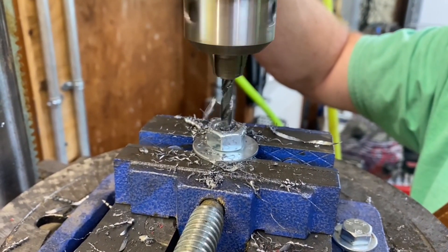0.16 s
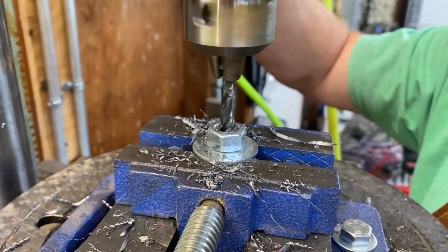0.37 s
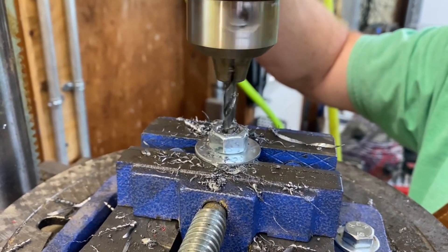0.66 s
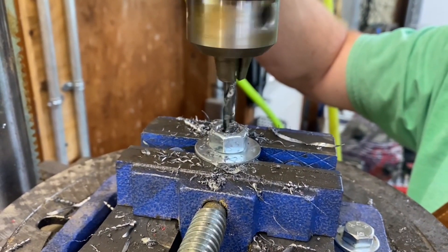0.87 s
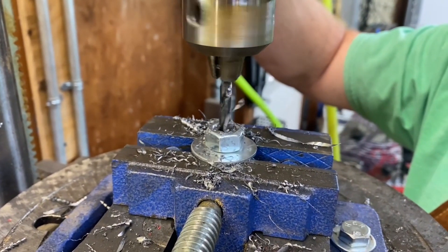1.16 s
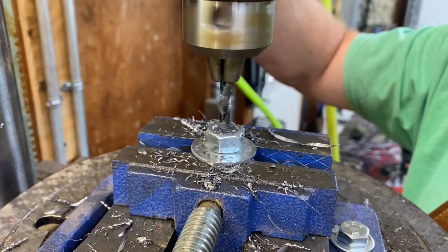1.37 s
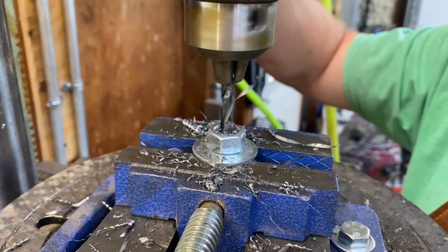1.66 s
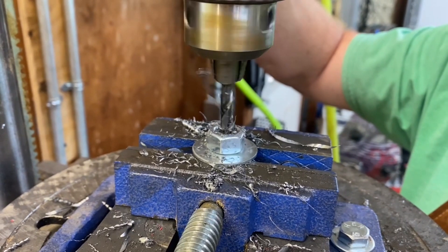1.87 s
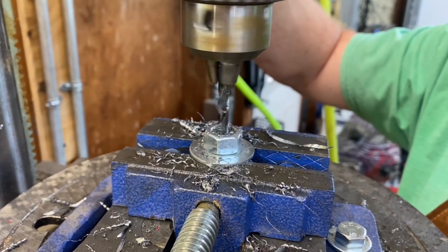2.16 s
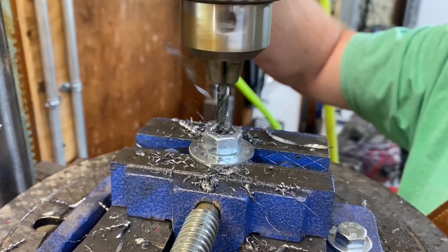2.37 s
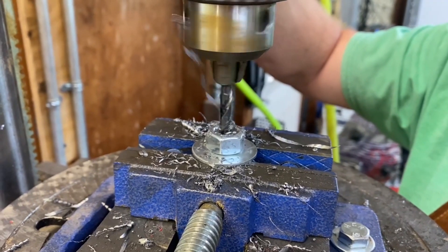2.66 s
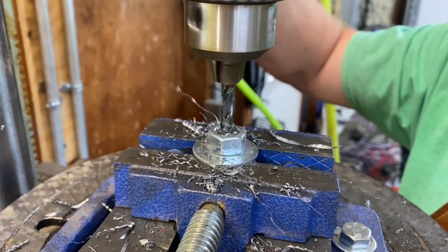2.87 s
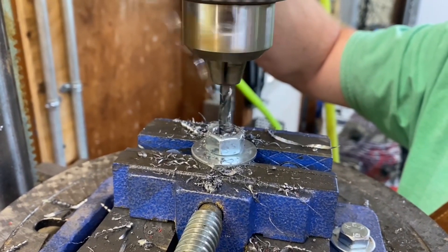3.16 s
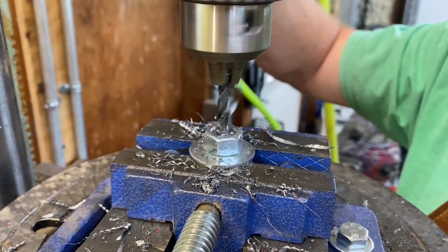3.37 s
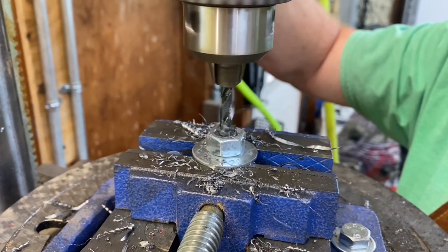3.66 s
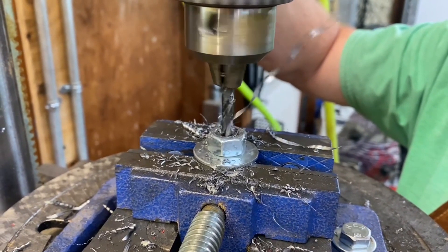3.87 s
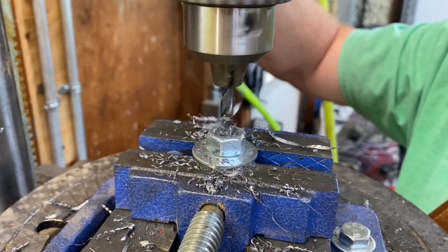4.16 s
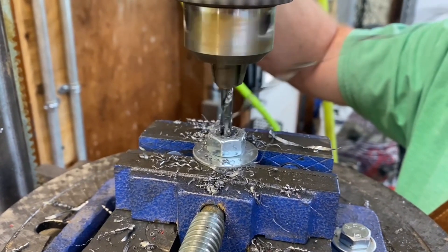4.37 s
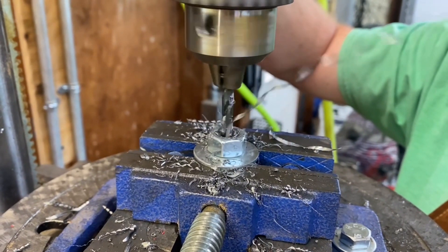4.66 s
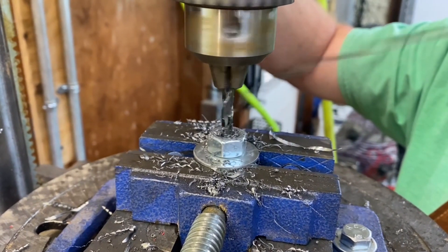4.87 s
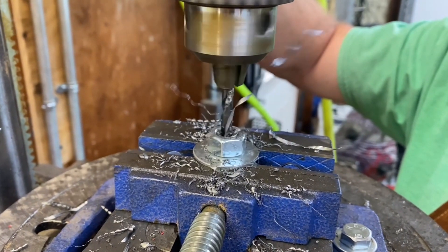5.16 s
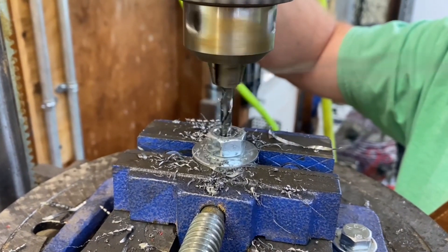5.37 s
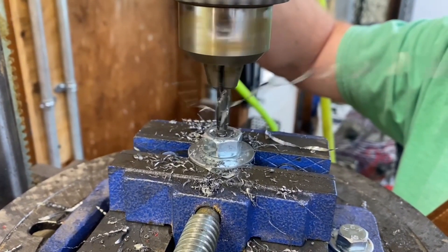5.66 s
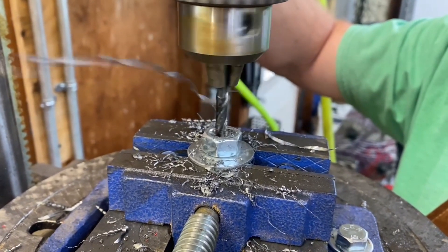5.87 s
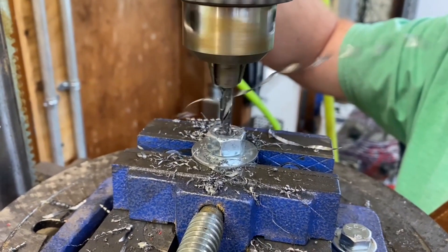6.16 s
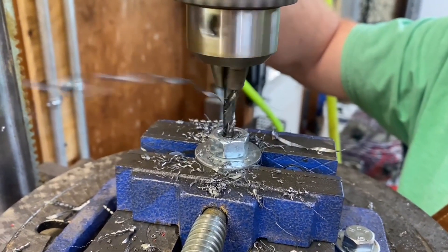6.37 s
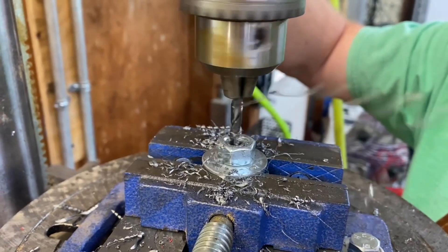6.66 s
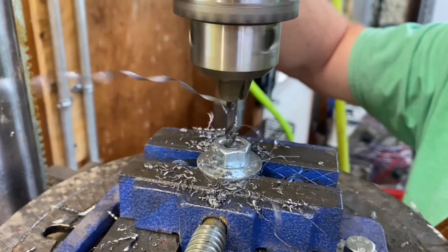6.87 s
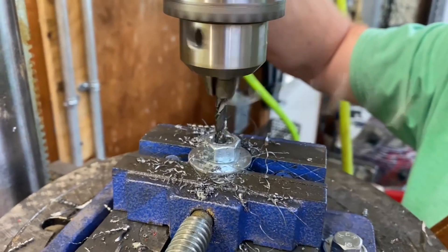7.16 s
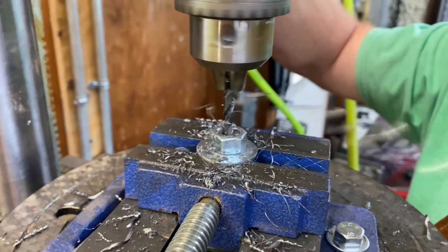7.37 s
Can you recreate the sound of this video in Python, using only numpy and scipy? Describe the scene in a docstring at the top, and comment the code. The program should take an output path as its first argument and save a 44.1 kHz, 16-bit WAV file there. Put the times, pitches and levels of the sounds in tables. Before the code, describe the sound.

Two close microphones beside a running drill press: constant mains hum, wavering motor whine and belt-guard drone. Over it, rough steel cutting surges and bites, first scraping with faint chirps, then turning brittle and crunchy, then scraping again with thin squeaks. Fine shavings crackle and tick throughout. Soft low thuds arrive late, followed by four hard snaps with thin high rings. The small room adds only a little reverberation.

```python
"""A drill press runs steadily in a small workshop while a twist bit bores slowly into a steel bolt held in a vise.
The motor's hum and whine are sine tones; belt, bearings and cutting edges are trains of tiny random
impacts coloured by the resonances of the machine. The edges bite and squeak, and curls of swarf
(metal shavings) crackle, whistle and tick against the steel. Two close microphones hear it."""
import sys
import numpy as np
from scipy import signal
from scipy.fft import rfft, irfft, next_fast_len
from scipy.io import wavfile
from scipy.ndimage import map_coordinates

SR = 44100
rng = np.random.default_rng(int(sys.argv[2]) if len(sys.argv) > 2 else 0)


def wrap_up_sound(samples):
    """Save the sound to the file named by the first command line argument, as 16-bit audio."""
    columns = np.atleast_2d(samples).T
    # keep every value between -1 and 1, then stretch to whole-number steps
    tamed = np.clip(columns, -1, 1)
    steps = np.round(tamed * 32767).astype(np.int16)
    wavfile.write(sys.argv[1], SR, steps)


N = 331191
T = np.arange(N) / SR  # time of each sample, s
SIDES = np.array([[.5], [-.5]])  # half of a left-right difference goes to each side
TOP_HZ = 15900  # band limit
RIPPLE_HZ = 120  # pulses of the motor's torque
THROB_HZ = 6.25  # slow throb of the lowest hum tone
TURN_HZ = 4.8  # turns of the bit a second

# Resonances of the press's head and table: pitch_hz, width_hz, lift_db
FRAME = [(144.5, 13.7, 15), (304.6, 16, 10), (320, 26, 7), (584.4, 31.5, 10.5), (1016, 30, 6.5),
         (1217, 53, 5), (1534, 61, 8.5), (1792, 150, 6), (1984, 23, 9), (2182, 29, 11.5)]
# Resonances of bit, chuck and vise: pitch_hz, width_hz, lift_db
BIT = [(2173, 26, 14), (2670, 135, 13.5), (2894, 13, 19.5), (3256, 99, 18.5), (3647, 114, 13),
       (4490, 63, 12), (5085, 97, 6.5), (5580, 240, -15), (7180, 400, 12), (8005, 75, 17), (9870, 83, 15),
       (12840, 700, 11.5)]
# Grinding, stronger as the bit is fed harder: start_s, level_db (before a trim)
FEED = [(0.0, -41.5), (0.55, -44.5), (0.85, -41.5), (1.45, -45.5), (1.75, -44), (2.65, -43.5), (2.9, -38.5),
        (3.22, -47), (3.35, -47), (3.7, -43.5), (4.4, -41.5), (4.8, -44), (5.05, -44.5), (5.3, -41.5),
        (5.85, -42), (6.25, -42.5), (6.7, -44.5), (7.51, -42)]
# Crackle of swarf in the flutes: start_s, level_db (before a trim)
CURL = [(0.0, -53), (0.14, -57), (0.35, -59), (1.46, -60), (2.59, -54.5), (2.87, -50), (3.3, -58.5),
        (3.66, -54.5), (4.6, -54.5), (5.48, -50.5), (5.79, -56.5), (6.32, -54.5), (6.78, -59), (7.51, -56)]
# Broad filter for crunches and crumbs, strongest near 5300 Hz, with a made dip at 9000 Hz:
# pitch_hz, density_db (per Hz)
CRUNCH = [(1500, -29), (3500, -12), (4900, 11), (5300, 17.5), (6100, 5), (9000, -21), (16000, -4)]
# Balance between the microphones: pitch_hz, left_minus_right_db
TILT = [(40, -3), (140, 2.5), (320, 1), (480, 2), (780, 7), (1200, 1.5), (1800, 1), (2900, 6.5), (3400, 3),
        (4600, 7.5), (6500, 1), (16000, -0.5)]


def amp(db):
    """Gain of a level in dB."""
    return 10 ** (np.asarray(db) / 20)


def unit(x):
    """x scaled to an rms (average strength) of 1."""
    return x / np.sqrt(np.mean(x ** 2) + 1e-20)


def along(points, hz):
    """Values between (Hz, value) points joined on a log axis."""
    f, v = np.transpose(points)
    return np.interp(np.log(hz + 1), np.log(f + 1), v)


def curves(rows):
    """One value per sample for each column after the time."""
    s, *cols = np.transpose(rows)
    return [np.interp(T, s, c) for c in cols]


def wobble(rate):
    """A smooth random curve with rate knots a second."""
    coarse = T[::16]
    knots = rng.standard_normal(1024)
    return np.interp(T, coarse, map_coordinates(knots, [coarse * rate], mode="wrap"))


def swell(s, width):
    """A bell-shaped rise and fall around time s; width is one standard deviation in s."""
    out = np.zeros(N)
    near = slice(*np.searchsorted(T, [s - 5 * width, s + 5 * width]))
    out[near] = np.exp(-.5 * ((T[near] - s) / width) ** 2)
    return out


def filtered(x, response):
    """x with each frequency multiplied by response(hz)."""
    m = next_fast_len(N + 8192)
    return irfft(rfft(x, m) * response(np.fft.rfftfreq(m, 1 / SR)), m)[..., :N]


def body(x, slope, resonances):
    """x through a vibrating body: a broad slope lifted by resonances, which respond only after a blow."""
    def response(hz):
        lift = sum((amp(db) ** 2 - 1) / (1 + (2 * (hz - f) / w) ** 2) for f, w, db in resonances)
        gain = amp(along(slope, hz)) * np.sqrt(np.maximum(1 + lift, 1e-3))
        # folding the cepstrum (spectrum of the log gain) gives a minimum-phase filter
        cepstrum = irfft(np.log(gain))
        half = len(cepstrum) // 2
        cepstrum[1:half] *= 2
        cepstrum[half + 1:] = 0
        return np.exp(rfft(cepstrum))
    return filtered(x, response)


def shifting(x, slope, detune=0.013, rate=13):
    """x through the bit, whose resonances slide up and down as the edges grip and let go."""
    def detuned(way):
        return body(x, slope, [(f * (1 + way * detune), w, db) for f, w, db in BIT])
    slack, tight = detuned(-1), detuned(1)
    grip = (1 + np.tanh(2 * wobble(rate))) / 2
    return unit(slack * (1 - grip) + tight * grip)


def grains(density, spread_db):
    """Two trains of random tiny impacts, density a second; spread_db sets how unequal their sizes are."""
    hit = rng.random((2, N)) < density / SR
    size_db = spread_db * np.minimum(rng.exponential(size=(2, N)), 4)
    return unit(hit * rng.standard_normal((2, N)) * amp(size_db))


def ripple(depth, third=0):
    """The motor's torque pulses twice per mains cycle and shakes what rubs; a third harmonic adds a rasp."""
    phase = 2 * np.pi * RIPPLE_HZ * T
    pulse = depth * (np.cos(phase) + .5 * np.cos(2 * phase))
    return unit(np.exp(pulse + third * np.cos(3 * phase)))


def tone(hz, db, pan_db, lead, clock):
    """A machine tone at an rms level; standing waves give it its own balance and lag."""
    phase = 2 * np.pi * (hz * clock + rng.random())
    return np.sqrt(2) * amp(db + SIDES * pan_db) * np.sin(phase + SIDES * lead)


def sing(hz, waver, rate):
    """A stick-slip tone of rms 1 whose pitch trembles."""
    phase = 2 * np.pi * np.cumsum(hz * (1 + waver * wobble(rate))) / SR
    return unit(np.array([np.sin(phase), np.cos(phase)]))


def motor(throb_db=0.5):
    """Magnetic hum is locked to the mains, its lowest tone throbbing; the rotor's tones waver and beat with it."""
    # Multiples of twice the mains frequency: pitch_hz, level_db (unused in the first row),
    # left_minus_right_db, left_lead_rad
    hum_tones = [(120, -29, 6, 0.9), (240, -41, 4, 1.7), (360, -44, 4, 0.1), (480, -48, -13, 0.8),
                 (600, -48, 10, -1.9), (720, -42, 18, -1.9), (840, -57, 9, -0.2)]
    # Lowest hum tone: start_s, level_db
    hum_level = [(0.0, -31), (1.3, -30), (6.17, -29), (7.05, -34), (7.51, -33.5)]
    # Rotor slots, shaft and pulleys: pitch_hz, level_db, left_minus_right_db, left_lead_rad
    shaft_tones = [(101.1, -52, 5, 0.1), (138.8, -46, 5, 0.1), (227.4, -47, 4, 0.0), (233.7, -51, 4, 0.4),
                   (472.6, -52, 2, -0.0), (570.2, -48, 10, 2.8), (629.5, -44, 2, 2.8),
                   (742.3, -42, 10, -0.3), (770.8, -53, 2, 0.3), (1490.7, -53, 3, 2.9),
                   (1781.6, -58, 9, 2.3)]
    throb = amp(throb_db * np.sin(2 * np.pi * THROB_HZ * T + 0.71 * wobble(1.3)))
    (hz, _, pan_db, lead), *overtones = hum_tones
    out = tone(hz, curves(hum_level)[0], pan_db, lead, T) * throb
    for hz, db, pan_db, lead in overtones:
        out += tone(hz, db, pan_db, lead, T)
    slip = .0005 * wobble(3)
    rotor_clock = T + np.cumsum(slip) / SR
    for hz, db, pan_db, lead in shaft_tones:
        out += tone(hz, db, pan_db, lead, rotor_clock)
    return out


def guard(pitch_hz=329, waver=0.012, pan_db=2.0, level_db=-41.5, swing_db=4.0, swell_rate=14, slap_s=0.024):
    """The belt guard drones unevenly on one mode and swells when the belt slaps."""
    # Belt slaps: centre_s, level_db (before the 1 dB cut below)
    belt_slaps = [(1.8, -34.5), (2.343, -31), (2.523, -37.5), (2.842, -31), (2.973, -37), (3.261, -32.5),
                  (3.445, -34), (3.801, -33), (3.975, -35), (4.614, -33.5), (4.861, -36), (5.421, -31),
                  (5.841, -29.5), (6.583, -33), (7.221, -34)]
    clock = T + np.cumsum(waver * wobble(30)) / SR
    drone = amp(level_db + swing_db * np.tanh(wobble(swell_rate)))
    slaps = sum(amp(db - 1) * swell(s, slap_s) for s, db in belt_slaps)
    return np.hypot(drone, slaps) * tone(pitch_hz, 0, pan_db, 0, clock)


def belt(level_db=-32.0, flutter_db=0.8):
    """Belt and bearings rattle the head of the press in many small, fluttering impacts."""
    # Colour of the running noise: pitch_hz, density_db (per Hz)
    rumble = [(20, -21), (34, -8.5), (52, 4), (110, -2), (200, -0.5), (270, -3), (390, 0), (520, -3.5),
              (670, -2), (800, -1.5), (900, -4.5), (1300, -8), (2000, -13), (3800, -18.5), (7000, -34.5),
              (16000, -50)]
    rattle = grains(density=6000, spread_db=2.0) * ripple(depth=0.035, third=0.05)
    rattle = rattle * amp(flutter_db * wobble(25))
    return amp(level_db) * unit(body(rattle, rumble, FRAME))


def bite(s, rise_s=0.0014, fall_s=0.0029):
    """An edge digs in quickly at time s and lets go more slowly."""
    out = swell(s, fall_s)
    start = np.searchsorted(T, s)
    out[:start] = swell(s, rise_s)[:start]
    return out


def catches(feed_share=0.32, count=84, spread_db=3.2, scatter_s=0.018):
    """Twice a turn an edge catches on the steel, a little early or late, and harder under a heavy feed."""
    chance = rng.standard_normal((count, 2))
    times = np.arange(count) / (2 * TURN_HZ) + scatter_s * chance[:, 0]
    feed_db = np.interp(times, *np.transpose(FEED))
    sizes_db = feed_share * (feed_db - feed_db.mean()) + spread_db * np.clip(chance[:, 1], -2, 1)
    return times, amp(sizes_db)


def cutting(grind_db=-1.0, bite_db=2, crunch_db=2, frame_db=-4, bite_frame_db=-4.5, uneven_db=6.0, surge_db=1.5):
    """Steel shears in tiny fractures that shake the frame; edges catch, or dig in with a scrape and crunch."""
    # Hard bites: centre_s, scrape_db, crunch_db (both before trims), fall_s (width of the falling half)
    bites = [(0.148, -37.5, -52, 0.0071), (0.247, -38, -58, 0.0061), (0.589, -41.5, -56, 0.0055),
             (0.648, -52, -47, 0.0046), (0.949, -35, -49, 0.0044), (1.645, -38.5, -60, .006),
             (1.713, -35.5, -61, .006), (1.998, -33.5, -47, 0.0036), (2.263, -43, -44, .005),
             (2.315, -37, -42, 0.0059), (2.364, -39.5, -37.5, 0.0056), (2.43, -38, -50, 0.0058),
             (2.48, -36, -47, 0.0069), (2.604, -42, -45, 0.0054), (2.688, -38, -38.5, .007),
             (2.721, -43, -41, .004), (2.764, -35, -32.5, 0.0049), (2.873, -40, -42, 0.021),
             (2.925, -41, -49, .006), (2.978, -39, -45, 0.0085), (2.997, -38.5, -46, 0.015),
             (3.039, -45, -43, .005), (3.156, -36.5, -39, 0.007), (3.214, -38, -48, 0.027),
             (3.261, -41, -41, 0.006), (3.43, -51, -47, .005), (3.472, -42, -43, 0.0055),
             (3.49, -39, -41, 0.0054), (3.512, -37, -48, 0.006), (3.555, -39, -36, 0.0039),
             (3.615, -36, -53, 0.0075), (3.668, -41, -48, .007), (3.755, -44, -48, .004),
             (3.863, -43, -39, .004), (3.882, -37, -42, 0.0066), (3.914, -37.5, -44, 0.0056),
             (3.996, -47, -44, .003), (4.064, -38, -45, 0.01), (4.137, -41, -41.5, 0.0057),
             (4.573, -35.5, -52, 0.009), (4.655, -39, -58, .014), (4.722, -33.5, -47, 0.0065),
             (4.792, -34.5, -55, 0.0077), (4.823, -37, -53, .006), (4.856, -36, -56, 0.009),
             (4.88, -39.5, -58, 0.021), (5.02, -43, -58, 0.009), (5.097, -38.5, -53, 0.0077),
             (5.181, -36.5, -54, 0.016), (5.238, -39, -53, 0.0085), (5.373, -34.5, -56, 0.0077),
             (5.397, -45, -42, 0.0048), (5.456, -34, -51, 0.0074), (5.489, -37, -56, .005),
             (5.689, -35, -44, .005), (6.038, -38, -51, 0.007), (6.098, -33, -49, .005),
             (6.172, -37.5, -54, .008), (6.272, -38, -60, 0.0055), (6.314, -35.5, -54, .006),
             (6.805, -37, -58, .006), (7.055, -37, -58, 0.0062)]
    # Colours of steady grinding, hard scrapes and the jolts to the frame: pitch_hz, density_db (per Hz)
    grind_colour = [(300, 0.5), (900, -1), (1700, 0.5), (2900, -4), (3700, -4.5), (4800, -3), (6300, -12.5),
                    (8500, -20), (16000, -28)]
    scrape_colour = [(500, -1), (1700, 0.5), (2700, -2.5), (3050, -1), (3270, 3), (3600, -2.5),
                     (5000, -4.5), (5900, -19), (16000, -15)]
    jolt_colour = [(500, -30.5), (1200, 9.5), (2100, 1.5), (4000, -24.5)]
    # how strong each part is over time
    surges = unit(amp(uneven_db * np.tanh(wobble(55)) + surge_db * np.tanh(wobble(14))))
    caught = sum(size * bite(s) for s, size in zip(*catches()))
    steady = amp(curves(FEED)[0] + grind_db) * np.hypot(surges, caught)
    digs = [bite(s, fall_s=fall) for s, _, _, fall in bites]
    dig = sum(amp(db + bite_db) * shape for (_, db, _, _), shape in zip(bites, digs))
    snap = sum(amp(db + crunch_db) * shape for (_, _, db, _), shape in zip(bites, digs))
    # the sounds themselves
    fractures = grains(density=8000, spread_db=2)
    grind = shifting(fractures * ripple(depth=0.051, third=0.11), grind_colour)
    scrape = shifting(grains(density=7000, spread_db=1.0), scrape_colour)
    frame = unit(body(rng.standard_normal((2, N)), jolt_colour, FRAME))
    crunch = unit(body(grains(density=4500, spread_db=2.5), CRUNCH, BIT))
    shake = np.hypot(amp(frame_db) * steady, amp(bite_frame_db) * dig)
    return steady * grind + dig * scrape + snap * crunch + shake * frame


def swarf(trim_db=-0.5, uneven_db=3.0):
    """Curls scrape up the flutes (grooves of the bit) with a fine, uneven crackle."""
    # Colour of thin swarf: pitch_hz, density_db (per Hz)
    swarf_colour = [(1500, -36), (4000, -12), (6000, 7), (8000, 7), (11000, 11), (14000, 3.5), (16000, 8.5)]
    crackle = grains(density=3800, spread_db=-0.5) * ripple(depth=0.2) * amp(uneven_db * wobble(60))
    return amp(curves(CURL)[0] + trim_db) * unit(body(crackle, swarf_colour, BIT))


def crumbs(trim_db=-1, rate=55, t60=0.064):
    """Crumbs of steel break in the flutes and ring the bit, more strongly when the chips are brittle."""
    # Crumbling as the chips grow brittle: start_s, level_db (before the trim)
    brittle = [(0.0, -55.5), (1.5, -65), (2.4, -48), (2.9, -52), (3.3, -59), (3.5, -51), (5.0, -53.5),
               (5.3, -50.5), (6.6, -61), (7.51, -56)]
    breaks = (rng.random(N) < rate / SR) * rng.uniform(0.4, 1, N)
    dying = signal.fftconvolve(breaks, amp(-60 * T[:2048] / t60))[:N]  # t60: time to fall 60 dB, s
    noise = dying * rng.standard_normal((2, N))
    return amp(curves(brittle)[0] + trim_db) * unit(body(noise, CRUNCH, BIT))


def small_chips(top_db=-14, count=26, over_crackle_db=12.5, spread_db=4):
    """Small chips fall at random, harder when more swarf is running: rows of time, level and treble."""
    chance = rng.random((count, 2))
    times = (np.arange(count) + chance[:, 0]) / count * T[-1]
    levels = np.interp(times, *np.transpose(CURL)) + over_crackle_db + spread_db * (2 * chance[:, 1] - 1)
    return [(s, db, top_db) for s, db in zip(times, levels)]


def chips(trim_db=-7.0, t60=0.03, rise_s=0.00036, brightening=0.88, stutter_db=3.0):
    """Ticks, mostly chips landing on the steel: each a short stutter of contacts, duller or brighter."""
    # Loud ticks; the first two are clicks where the sound starts abruptly, the others chips that
    # hit the vise: start_s, level_db (before the trim), treble_db (relative)
    loud_ticks = [(0.011, -34.5, 6), (0.017, -37, 1), (0.266, -37.5, -22), (0.291, -33.5, -28),
                  (0.5033, -37, -24), (0.822, -40, -9), (1.748, -33, -29), (2.087, -35, -23),
                  (2.479, -39, -22), (2.604, -38.5, -22), (2.688, -40, -3), (2.7624, -38, -14),
                  (2.868, -37.5, -24), (2.979, -38, -31), (3.062, -41, -16), (3.336, -38.5, -24),
                  (3.452, -41, -14), (3.553, -37, -17), (3.7535, -40, -18), (3.861, -37, -15),
                  (3.9935, -40, -14), (4.0362, -37.5, -23), (4.222, -36, -27), (4.629, -34.5, -28),
                  (5.003, -38, -27), (5.334, -42, -11), (5.631, -38, -12), (6.457, -43, -4),
                  (6.555, -36.5, -10), (6.775, -36, -25)]
    # Colour of a tick: pitch_hz, density_db (per Hz)
    tick_colour = [(1500, -7), (3500, 1), (5200, 7), (7500, 4), (11000, 11), (16000, -14)]
    t = np.arange(4096) / SR
    out = np.zeros((2, N + len(t)))
    hz = np.fft.rfftfreq(len(t), 1 / SR)
    usual_db = np.mean([row[2] for row in loud_ticks])
    for s, db, top_db in loud_ticks + small_chips():
        contacts_db = stutter_db * rng.uniform(-0.91, 1, len(t) // 32).repeat(32)
        stutter = rng.standard_normal((2, len(t))) * amp(contacts_db)
        # treble is raised above 8000 Hz as much as the rest is lowered, or the reverse
        colour = amp(brightening * (top_db - usual_db) * np.clip((hz - 8000) / 4000, -1, 1))
        burst = unit(irfft(rfft(stutter) * colour))
        burst = burst * amp(-60 * t / t60) * (1 - np.exp(-t / rise_s))
        out[:, round(s * SR):][:, :len(t)] += amp(db + trim_db) * burst
    return body(out[:, :N], tick_colour, BIT)


def whistles():
    """Thin swarf dragged over the bolt sings high and hoarse, its pitch trembling fast."""
    # Scraping curls: centre_s, level_db, pitch_hz, length_s (two standard deviations of the swell)
    curl_scrapes = [(0.07, -47, 10900, 0.014), (0.212, -49.5, 11200, 0.061), (0.358, -44, 8100, 0.021),
                    (0.505, -50, 7750, 0.024), (2.97, -50, 11400, 0.028), (3.473, -53, 10700, 0.072)]
    return sum(amp(db) * swell(s, length / 2) * sing(hz, waver=0.068, rate=1100)
               for s, db, hz, length in curl_scrapes)


def squeaks(pitch_hz=4470, fade_s=0.029):
    """Stick-slip against the hole's wall sings a mode of the bit: faint chirps in fits and clear squeaks."""
    # Spells of rubbing on the wall of the hole: start_s, end_s, level_db (before the fits)
    rubs = [(0.7, 1.407, -51), (5.9, 6.9, -61)]
    # Clear squeaks: centre_s, level_db, length_s (two standard deviations of the swell)
    clear_squeaks = [(0.46, -45, 0.018), (1.568, -48, 0.014), (1.614, -48, .024), (4.745, -50, .02),
                     (5.927, -48, .014), (5.967, -46, 0.018), (6.043, -46, .022), (6.177, -50, .028),
                     (6.431, -42.5, 0.024), (6.485, -51, .018), (6.61, -50, 0.035), (6.748, -49, 0.014),
                     (6.996, -39.5, 0.013)]
    spells = sum(amp(db) * np.clip(np.minimum(T - start, end - T) / fade_s, 0, 1) for start, end, db in rubs)
    fits = np.tanh(np.maximum(wobble(24), 0))
    clear = sum(amp(db) * swell(s, length / 2) for s, db, length in clear_squeaks)
    return (spells * fits + clear) * sing(pitch_hz, waver=0.00706, rate=330) * ripple(depth=0.16)


def thuds(pitch_hz=60, width_s=0.022):
    """A few soft low thuds under the hum, each a brief swell of a low tone."""
    # Dull thuds late in the cut: centre_s, level_db
    late_thuds = [(6.41, -38), (6.56, -36), (6.89, -41)]
    return sum(swell(s, width_s) * tone(pitch_hz, db, along(TILT, pitch_hz), 0, T) for s, db in late_thuds)


def pings(ring_db=-3, crack_db=-11, crack_t60=0.062, blur=0.055, snap_t60=0.0075):
    """A whipping curl strikes the steel: a hard snap, a short rattle and a thin, high, slightly rough ring."""
    # Strikes: start_s, level_db, then ring levels before trims: low_db, middle_db, top_db
    strikes = [(6.917, -33, -40, -30, -43), (7.0888, -29.5, -46, -34, -42), (7.278, -31.5, -36, -35, -31),
               (7.463, -31, -39, -33, -38)]
    # Ringing modes of the steel: pitch_hz, level_db (added to the ring levels), t60_s
    steel = [(5090, 0, 0.22), (9534, 3, .05), (10900, -7, .04), (12300, -11, .05), (15150, 3, 0.12),
             (15520, 0, .09)]
    # Colour of snap and rattle: pitch_hz, density_db (per Hz)
    crack_colour = [(2000, -18), (5000, -1), (9000, -6), (16000, 0)]
    t = np.arange(SR // 4) / SR
    rings, cracks = np.zeros((2, 2, N + len(t)))
    for s, db, low_db, middle_db, top_db in strikes:
        strength = [(steel[0][0], low_db), (steel[1][0], middle_db),
                    (steel[-3][0], middle_db), (steel[-2][0], top_db)]
        ring = 0
        for hz, level, t60 in steel:
            # a random walk of phase roughens the higher modes most
            roughness = blur * hz / steel[-1][0] * np.cumsum(rng.standard_normal(len(t)))
            mode_db = level + along(strength, hz) + rng.normal(0, 1.2)
            ring = ring + amp(mode_db - 60 * t / t60) * np.sin(2 * np.pi * hz * t + roughness)
        rings[0, round(s * SR):][:len(t)] += amp(ring_db) * ring * (1 - np.exp(-t / 0.0009))
        snap = amp(db - 60 * t / snap_t60)
        rattle = amp(db + crack_db - 60 * t / crack_t60)
        cracks[:, round(s * SR):][:, :len(t)] += (snap + rattle) * rng.standard_normal((2, len(t)))
    return rings[:, :N] + body(cracks[:, :N], crack_colour, BIT)


def microphones(pair):
    """Two unrelated signals become left and right, partly alike, with the balance and lag of the spot."""
    # How alike the two sides are: pitch_hz, likeness (0 to 1)
    alike = [(50, 0.62), (300, 0.97), (500, 0.7), (800, 0.73), (2000, 0.32), (4500, 0.31), (7000, 0.93),
             (15000, 1)]
    # Phase between the microphones: pitch_hz, left_lead_rad
    phase_lead = [(450, 0), (620, -2.4), (800, .2), (1050, 1.4), (1400, 2.2), (2200, 0), (3500, -.6),
                  (7500, 0), (8900, 3.1), (10400, 6.2), (11700, 6.3), (13200, 9.4), (14600, 12.5)]

    def shares(hz):
        turn = np.arccos(np.clip(along(alike, hz), -1, 1)) / 2
        return np.array([np.cos(turn), np.sin(turn)])

    def placing(hz):
        return amp(SIDES * along(TILT, hz)) * np.exp(1j * SIDES * along(phase_lead, hz))
    mid, side = filtered(pair, shares)
    return filtered(np.array([mid + side, mid - side]), placing)


def shop(x):
    """The small room's short answer: fading noise, different at each microphone."""
    # Time for the room to fall 60 dB: pitch_hz, t60_s
    room_fade = [(200, 0.075), (3000, 0.42), (14000, 0.017)]
    hz, t, z = signal.stft(rng.standard_normal((2, SR // 3)), SR, nperseg=256)
    fade = amp(-60 * t / along(room_fade, hz)[:, None])
    tail = signal.istft(z * fade, SR, nperseg=256)[1]
    tail = np.pad(tail, ((0, 0), (SR // 200, 0)))  # the answer starts 5 ms late
    return signal.fftconvolve(x, tail / np.linalg.norm(tail[0]), axes=1)[:, :N]


def scene(room_db=-13):
    """Motor and belt run while the bit works; only the work is echoed by the room."""
    work = cutting() + swarf() + crumbs() + chips() + pings() + squeaks() + whistles()
    return motor() + guard() + thuds() + microphones(belt() + work) + amp(room_db) * shop(work)


def record(dry):
    """Nothing is kept above the band limit."""
    return filtered(dry, lambda hz: hz < TOP_HZ)


dry = scene()
out = record(dry)
wrap_up_sound(out)
```